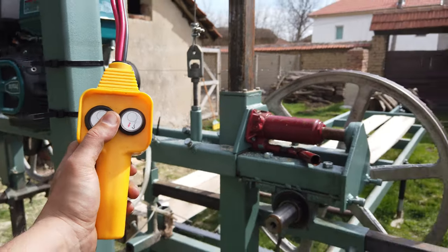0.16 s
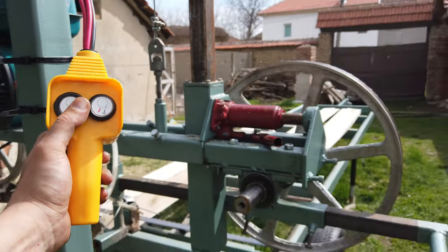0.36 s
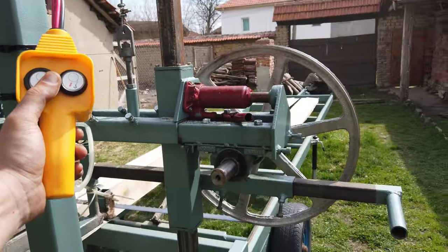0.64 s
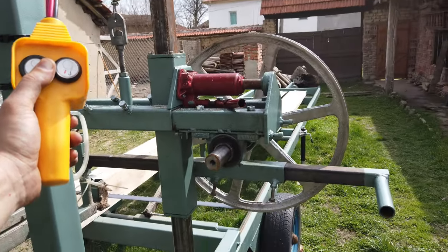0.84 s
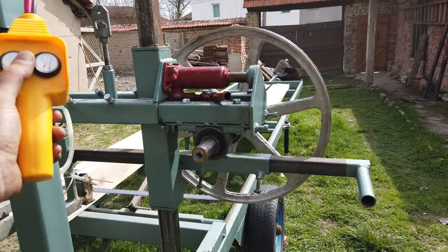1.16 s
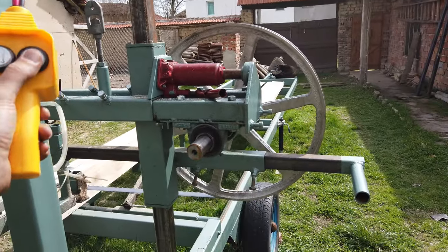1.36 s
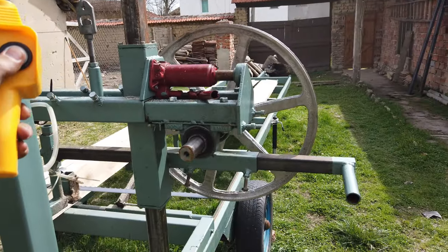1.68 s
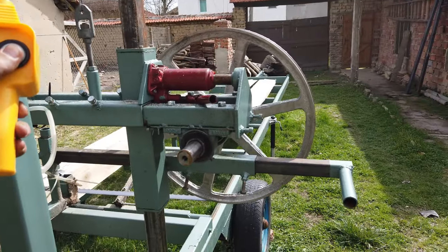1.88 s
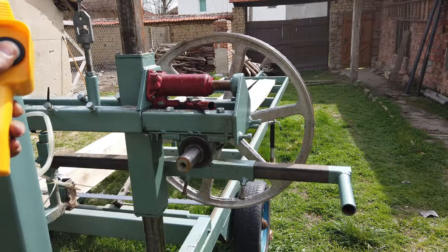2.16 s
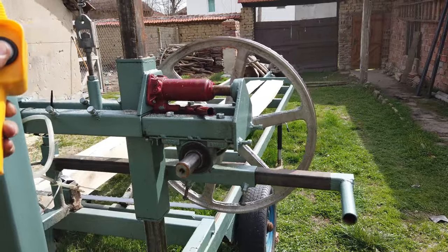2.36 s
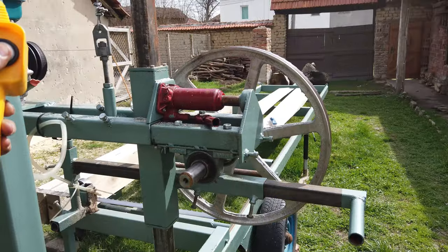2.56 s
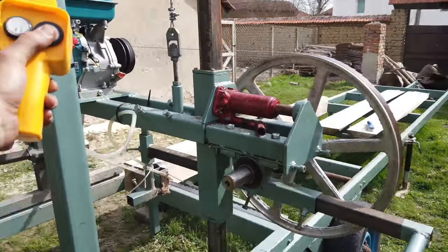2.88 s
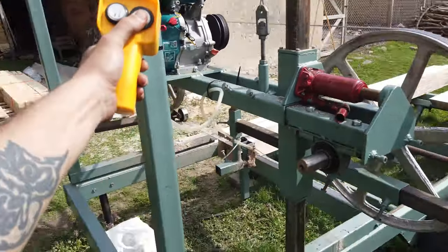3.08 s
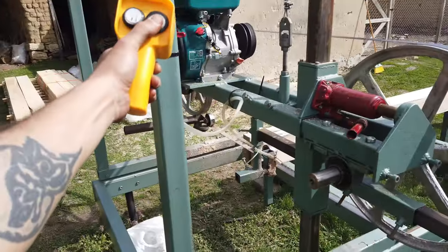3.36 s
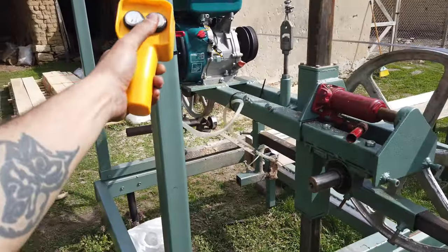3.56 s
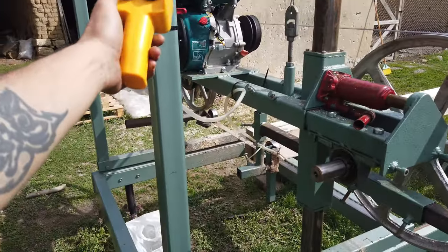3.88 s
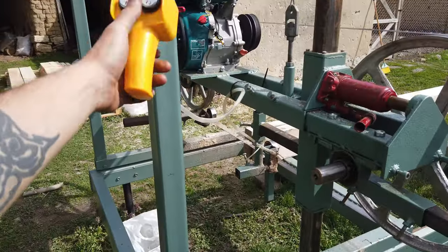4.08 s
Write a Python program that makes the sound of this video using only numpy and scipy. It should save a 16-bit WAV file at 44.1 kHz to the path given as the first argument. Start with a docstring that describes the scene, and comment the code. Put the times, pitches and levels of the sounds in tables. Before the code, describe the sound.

A handheld microphone stands a step from a winch on a steel frame. The motor grinds and whines under strain for about a second, cuts off with a jolt, and small dry clicks follow. It spins up higher, winds down, spins up again before stopping, then coasts to rest, with occasional gear clacks and only a faint outdoor reflection.

```python
"""Outdoors, in a yard, a step from a small electric winch bolted to a steel machine frame.
It hoists a heavy part and stops against the load; a wheel rings on and a switch clicks.
Then it lowers twice, faster, coasting down each time: the motor whines, the gears grind and throb.
Whine is summed shaft overtones, grinding is noise pulsed once a turn, clacks and rings are struck modes."""
import sys
import numpy as np
from scipy import signal
from scipy.fft import rfft, irfft
from scipy.io import wavfile

SR = 44100
rng = np.random.default_rng(int(sys.argv[2]) if len(sys.argv) > 2 else 0)


def materialize(psi):
    """Save the field psi as 16-bit PCM at rate SR to the path in sys.argv[1].

    A 1-D psi becomes a single channel; in a 2-D psi each row is a channel.
    """
    bounded = np.clip(np.atleast_2d(psi).T, -1, 1)
    quanta = np.round(bounded * 32767).astype(np.int16)
    wavfile.write(sys.argv[1], SR, quanta)


N = 186498
TIME = np.arange(N) / SR
HZ = np.fft.rfftfreq(N, 1 / SR)

# Motor speed while hoisting, before surge and jitter. Each row: time in seconds, turns per second.
HOIST_SPEED_HZ = [(0, 267), (.06, 267.5), (.14, 271.5), (.2, 269), (.36, 270.5), (.55, 273), (.63, 279),
                  (.69, 278), (.82, 281.5), (.89, 277.5), (.96, 277)]
# Hoisting whine. Each row: multiple of motor speed, relative dB with cable slack, relative dB with it tight.
HOIST_OVERTONES = [(2, -13.5, -13), (4, -11, -4), (5, -3, 0.5), (6, -4.5, -3), (7, -11.5, 1), (8, 1, -1),
                   (9, -8, -2), (10, -2.5, -7.5), (11, 2.5, 4.5), (12, 1.5, -0.5), (13, -1, -2),
                   (14, -14.5, -9.5), (15, -5.5, -7)]
# Lowering whine. Each row: multiple of motor speed, relative dB in the first lowering, in the second.
LOWER_OVERTONES = [(2, -3, 0), (3, 2.5, -2), (4, 0.5, 2.5), (5, 3, 4.5), (6, 7, 5.5), (7, 3.5, 4),
                   (8, 3, 3.5), (9, 3.5, -2.5), (10, 4.5, 8), (11, -6, 3.5), (12, 0.5, -0.5)]
# Colour of the gears grinding on the hoist. Each row: frequency in Hz, relative dB per Hz.
HOIST_GRIND_COLOUR = [(60, -32.5), (130, -19.5), (280, -14), (520, -12), (680, -16.5), (930, -15),
                      (1100, -10), (1500, -10.5), (2100, -2.5), (2600, -4.5), (3200, -0.5), (3800, -13),
                      (5200, -16.5), (7500, -22.5), (10000, -28), (15500, -43.5)]
# Colour of the gears grinding on the way down. Each row: frequency in Hz, relative dB per Hz.
LOWER_GRIND_COLOUR = [(60, -30), (130, -48), (300, -2.5), (540, -9.5), (720, -5.5), (820, -2), (930, -9),
                      (1080, -4), (1400, -0.5), (2300, 6), (2800, 1), (3100, 7.5), (3450, 5.5), (3750, -1),
                      (4800, -8.5), (7000, -17.5), (11500, -27.5), (15500, -37.5)]
# Ringing of the steel frame. Each row: frequency in Hz, relative dB, t60 in seconds.
FRAME_MODES = [(305, -14.5, 0.32), (461, 3, 0.52), (756, -6.5, 0.17), (846.6, 10, 0.17), (1630, -2, 0.1),
               (1910, -14.5, 0.089), (2160, -9.5, 0.15), (2490, -4.5, 0.1), (2670, -12.5, 0.19),
               (3110, -3, 0.16), (3480, -8.5, .1)]
# Clicks of the switch and the settling gear train. Each row: start in seconds, relative dB.
CLICK_HITS = [(1.085, -39), (1.2468, -53), (1.3662, -52), (1.4797, -39), (1.5835, -56), (1.606, -60)]
# Ringing of one click. Each row: frequency in Hz, relative dB, t60 in seconds.
CLICK_RING = [(1543, 2, 0.031), (2250, 6, 0.027), (2940, -9.5, .03), (3550, -3.5, 0.02)]
# Gear teeth clacking. Each row: start in seconds, peak dB, pitch in Hz.
TOOTH_CLACKS = [(.003, -9.5, 2930), (.179, -12.5, 2900), (0.9335, -18, 3140), (1.01, -25, 2310),
                (1.665, -26.5, 2380), (1.7618, -16, 2990), (1.8117, -11.5, 2315), (2.756, -26, 3050),
                (2.7938, -14, 3420), (3.2513, -16, 2710), (3.3322, -20, 2024), (3.53, -26, 6460),
                (3.673, -23.5, 1800), (4.196, -47.5, 2320)]
# Colour of the still air. Each row: frequency in Hz, relative dB per Hz.
AIR_COLOUR = [(15, -22), (25, -3), (42, -0.5), (70, -6), (150, -14), (363, -20.5), (488, -17.5),
              (655, -24.5), (1540, -23.5), (2500, -23.5), (3540, -35), (6200, -39), (15000, -57)]
# Stereo width. Each row: frequency in Hz, left-right likeness from -1 to 1.
LIKENESS = [(100, 1), (300, 0.97), (520, 0.95), (750, 0.46), (1200, 0.62), (2500, 0.31), (4500, 0.26),
            (8000, -0.35), (15000, 0.26)]
# The brake grabs or the load settles. Each row: start in seconds, peak dB.
THUMP_HITS = [(.99, -37), (1.03, -38.5), (1.2, -58), (4.03, -43), (4.1, -56)]
# Ringing of one thump. Each row: frequency in Hz, relative dB, t60 in seconds.
THUMP_RING = [(125.5, -12, 0.39), (162, 2, 0.15), (397, 0, 0.2)]
# Colour of the cable drum rolling in its bearings. Each row: frequency in Hz, relative dB per Hz.
DRUM_COLOUR = [(60, -26), (105, -8.5), (150, -0.5), (230, -7.5), (380, 7), (465, 1.5), (540, 3.5),
               (760, -0.5), (830, 9), (930, -7), (2000, 3.5), (6000, -45)]
# Ringing of the big spoked wheel. Each row: frequency in Hz, relative dB, t60 in seconds.
WHEEL_MODES = [(840, -12.5, 0.84), (1110, -17.5, 0.98), (1640, -4, 0.75), (1887, -5.5, 1.13),
               (2283, -23, 1.2), (2918, -16, 0.46), (6100, -12, 0.27)]
# Gain on a band near 3.2 kHz as the microphone's facing shifts. Each row: time in seconds, dB.
FACING_GAIN = [(2.0, 1), (2.9, 2), (3.15, -4), (3.5, -7.5)]
# Presses of the lowering button. Each row: press in seconds, release in seconds, top speed in Hz,
# gear level in dB before trims, fade while coasting in dB per second, low panel level in dB.
BUTTON_PRESSES = [(1.632, 2.372, 341.1, -24.5, 3.5, -29.5), (2.75, 3.453, 338.2, -26, -4.5, -39.5)]
# Resonances of the motor housing. Each row: frequency in Hz, width in Hz, relative dB.
HOUSING_MODES = [(1000, 13.5, 3), (1329, 51, 2.5), (1616, 68, 0), (1843, 180, -4), (2140, 84, -5.5),
                 (2418, 360, -3), (2605, 80, -9), (3012, 56, 2.5), (3535, 170, -1), (3980, 140, -1.5)]
# Colour of the button rubbing in its guide. Each row: frequency in Hz, relative dB per Hz.
SCRAPE_COLOUR = [(300, -22), (1100, -15), (1550, 1), (1900, -6), (2300, 0), (2800, -2), (3600, 0),
                 (4700, -6), (5600, -25.5), (12000, -47.5)]
# Two panels droning as the drum creeps to rest. Each row: frequency in Hz, relative dB per Hz.
CREEP_COLOUR = [(100, -17), (190, -12.5), (420, -25), (460, -5), (500, -17), (780, -24), (830, 1.5),
                (890, -28), (1500, -40), (4000, -70)]

FIRST_GEAR, SECOND_GEAR = 15.6, 49.25  # motor turns per gear turn
SURGE_HZ, SURGE_AT = 0.99, 0.715  # hoist speed surges once a second-gear turn, at this share of it
TIGHTEN_S = 0.79  # time the cable takes to come tight
HOIST_DB, HOIST_GEARS_DB, HOIST_WHINE_DB, HOIST_FLUTTER_DB = -25.5, -2.6, .8, .8
BRAKE_AT_S, RATTLE_FADE_DB_PER_S, WHINE_FADE_S = 0.95, 192, .07
WHEEL_AT_S, WHEEL_DB = 0.94, -44
BOUNCE_S, BOUNCE_DB = 0.00285, -7  # each contact lands twice
SCRAPE_AT_S, SCRAPE_S, SCRAPE_DB = 1.57, 0.068, -72.5
SPIN_UP_S = .047  # time constant of the run-up
DRAG_S, FRICTION_HZ_PER_S = 1.467, 296  # coasting: drag in step with speed, plus dry friction
TAKE_UP_S, SWELL_S = 0.012, 0.039  # from rest, the gears engage after a delay and swell in
RATTLE_KNEE_HZ, STRAIN_DB = 265, 6.5  # gears quieten below the knee, are louder under strain
LOOSE, LOOSER_WHEN_SLOW = .3, .65
YARD_DB, AIR_DB = -33, -69.5
EDGE_HZ = 15650


def amp(db):
    """Decibels to gain."""
    return 10 ** (np.asarray(db) / 20)


def unit(x):
    """Scales to rms 1."""
    return x / np.sqrt(np.mean(abs(x) ** 2) + 1e-20)


def curves(rows):
    """Each column of a timed table, sample by sample."""
    s, *columns = np.transpose(rows)
    return [np.interp(TIME, s, c) for c in columns]


def read(points, hz):
    """A spectrum joined by straight lines over log frequency."""
    f, value = np.transpose(points)
    return np.interp(np.log(hz + 1), np.log(f + 1), value)


def wander(rate_hz):
    """Slow random drift of rms 1, made at 1/32 of the sample rate."""
    count = N // 32 + 2
    f = np.fft.rfftfreq(count, 32 / SR)
    lowpass = 1 / np.sqrt(1 + (f / rate_hz) ** 4)
    slow = irfft(rfft(rng.standard_normal(count)) * lowpass, count)
    return unit(np.interp(np.linspace(0, count - 1, N), np.arange(count), slow))


def noise():
    """Two unrelated channels of white noise."""
    return rng.standard_normal((2, N))


def spread(pair, colour):
    """Colours two unrelated signals and mixes them to the tabled left-right likeness, at rms 1."""
    a, b = rfft(pair)
    same = np.clip(read(LIKENESS, HZ), -1, 1)
    mid, side = a * np.sqrt(1 + same), b * np.sqrt(1 - same)
    return unit(irfft(np.array([mid + side, mid - side]) * amp(read(colour, HZ)), N))


def ring(modes, seconds):
    """The stereo answer of a set of decaying modes to one blow."""
    t = np.arange(int(seconds * SR)) / SR
    phases = rng.uniform(-0.23, 0.02, (len(modes), 2, 1))  # turns
    out = np.zeros((2, len(t)))
    for (hz, db, t60), phase in zip(modes, phases):
        out += amp(db - 60 * t / t60) * np.cos(2 * np.pi * (hz * t + phase))
    return out


def scatter(t60, seconds):
    """A dense stereo noise tail, scaled to energy 1 on the left."""
    t = np.arange(int(seconds * SR)) / SR
    tail = rng.standard_normal((2, len(t))) * np.exp(-np.log(1000) * t / t60)
    return tail / np.linalg.norm(tail[0])


def through(x, answer):
    """Convolves and keeps the scene's length."""
    return signal.fftconvolve(np.atleast_2d(x), answer, axes=1)[:, :N]


def bandpass(x, low_hz, high_hz, order):
    """Butterworth band filter."""
    return signal.sosfilt(signal.butter(order, [low_hz, high_hz], "band", fs=SR, output="sos"), x)


def blows(rows):
    """One impulse for each row of (s, dB)."""
    out = np.zeros(N)
    for s, db in rows:
        out[int(max(s, 0) * SR)] += amp(db)
    return out


def running(start_s, stop_s, fade_s):
    """Swells in at start and dies away after stop."""
    swell = np.clip((TIME - start_s) / SWELL_S, 0, 1) ** 2
    return swell * np.exp(-np.maximum(TIME - stop_s, 0) / fade_s)


def throb(turns, slack_at, depth_db, half_turn_db):
    """Second gear's slack: level dips once a turn and half a turn later (negative: swells), mean 0 dB."""
    angle = np.cos(2 * np.pi * (turns / SECOND_GEAR - slack_at))
    dips = depth_db * np.exp(4 * (angle - 1)) + half_turn_db * np.exp(4 * (-angle - 1))
    return dips.mean() - dips


def flicker(x, depth_db, rate_hz):
    """Each band of the treble flickers on its own."""
    centres_hz, spectrum = np.geomspace(4000, 15000, 9), rfft(x)
    shares = [np.interp(HZ, centres_hz, one) for one in np.eye(len(centres_hz))]
    return sum(irfft(spectrum * share, N) * amp(depth_db * wander(rate_hz)) for share in shares)


def grind(turns, colour, treble_db, bite, uneven_db, flutter_db, ringing, case_t60):
    """Each turn of the pinion throws a burst of tooth impacts, of uneven force, into the gear case."""
    force = amp(uneven_db * rng.standard_normal(2000))[turns.astype(int)]  # one draw per turn
    bursts = force * np.exp(bite * np.cos(2 * np.pi * turns)) * amp(flutter_db * wander(23))
    impacts = unit(bursts * noise())
    case = through(impacts, scatter(case_t60, 0.093))
    sound = spread(impacts + ringing * case, colour)
    treble = irfft(rfft(sound) / (1 + (5200 / (HZ + 1)) ** 8), N)
    return sound - treble + amp(treble_db) * flicker(treble, depth_db=1.5, rate_hz=35)


def backlash(turns, chance):
    """On random turns a slack tooth slaps its neighbour; the case clanks briefly at one of six spots."""
    new_turn = np.diff(np.floor(turns), prepend=0) > 0
    slaps = new_turn * (rng.random(N) < chance) * amp(2.5 * rng.standard_normal(N))
    spot = rng.integers(0, 6, N)
    clanks = np.zeros((2, N))
    for k in range(6):
        clanks += through(slaps * (spot == k), bandpass(scatter(.04, .06), 1200, 4100, order=4))
    return unit(clanks)


def whine(turns, orders, rough, rough_per_order, blur_hz, sway):
    """Overtones of the shaft; the first gear gives them sidebands and tooth play blurs the high ones."""
    gear, out = 2 * np.pi * turns / FIRST_GEAR, np.zeros((2, N))
    for k, db in orders:
        start, lobe, side = rng.uniform(0, 2 * np.pi, 3)
        share = np.clip(rough + rough_per_order * k, 0, .95)
        clean = np.exp(1j * (start + sway * np.sin(gear + lobe)))
        blurred = (wander(blur_hz) + 1j * wander(blur_hz)) / np.sqrt(2)
        mixed = np.sqrt(1 - share) * clean + np.sqrt(share) * blurred
        line = mixed * np.exp(2j * np.pi * k * turns)
        # left-right phase offset drawn from the tabled likeness
        half_angle = np.arccos(np.clip(read(LIKENESS, k * 300), -1, 1)) / 2
        apart = half_angle * (np.sign(np.sin(side)) * 0.69 + .5 * wander(4.9))
        out += amp(db) * (line * np.exp(1j * np.array([apart, -apart]))).real
    return unit(out)


def hum(turns, swing, lead, peak_at):
    """The shaft's own tone, swelling with each turn of the first gear."""
    gear = 2 * np.pi * (turns / FIRST_GEAR - peak_at)
    swell = 1 + swing * np.cos(gear) + 0.29 * wander(21)
    return unit(swell * np.cos(2 * np.pi * turns + lead * np.sin(gear)))


def hoist():
    """Loaded motor: gears grind, order 3 sings on a panel; the brake cuts the whine faster than the rattle."""
    speed, = curves(HOIST_SPEED_HZ)
    second_gear = np.cumsum(speed) / SR / SECOND_GEAR
    speed = speed + SURGE_HZ * np.cos(2 * np.pi * (second_gear - SURGE_AT))
    turns = np.cumsum(speed * (1 + 0.003 * wander(25))) / SR
    braked_s = np.maximum(TIME - BRAKE_AT_S, 0)
    tight = np.clip(TIME / TIGHTEN_S, 0, 1) ** 2

    # brighter as the cable tightens
    treble_db = -0.5 + 4.1 * tight - 110 * braked_s
    treble_db = treble_db + throb(turns, slack_at=0.28, depth_db=0.0, half_turn_db=-2.7)
    gears = grind(turns, HOIST_GRIND_COLOUR, treble_db, bite=0.3, uneven_db=0.9,
                  flutter_db=HOIST_FLUTTER_DB, ringing=0.55, case_t60=0.12)
    gears = amp(HOIST_GEARS_DB) * gears + amp(-11.5) * backlash(turns, chance=.3)

    orders = [(k, slack_db + (tight_db - slack_db) * tight) for k, slack_db, tight_db in HOIST_OVERTONES]
    tone = whine(turns, orders, rough=0.1226, rough_per_order=0.067, blur_hz=24.6, sway=0.61)
    shaft = amp(-26 + 6.5 * tight) * hum(turns, swing=0.22, lead=0.55, peak_at=0.64)
    panel_db = -12.5 + 3.1 * tight + throb(turns, slack_at=0.53, depth_db=4.5, half_turn_db=4)
    panel = amp(panel_db) * whine(turns, [(3, 0)], rough=0.32, rough_per_order=0, blur_hz=30, sway=0.89)
    tonal = (amp(HOIST_WHINE_DB) * tone + shaft + panel) * np.exp(-braked_s / WHINE_FADE_S)
    return amp(HOIST_DB - RATTLE_FADE_DB_PER_S * braked_s) * (gears + tonal)


def clacks():
    """A tooth now and then lands hard: the gear case clatters and rings briefly, at that clack's pitch."""
    out = np.zeros((2, N))
    for s, db, hz in TOOTH_CLACKS:
        clatter = bandpass(scatter(0.091, .12), .7 * hz, min(0.94 * hz, EDGE_HZ), order=2)
        clack = unit(clatter) + 1.2 * unit(ring([(hz, 0, .05)], .12))
        out += through(blows([(s, db)]), clack / abs(clack).max())
    return out


def frame(winch):
    """The steel frame rings in its modes, driven by the winch."""
    return amp(-60.0) * through(winch.mean(0), ring(FRAME_MODES, 1.5))


def yard(near):
    """Yard walls answer faintly with a dense tail."""
    return amp(YARD_DB) * through(near, scatter(.4, .6))


def still_air():
    """Steady coloured noise."""
    return amp(AIR_DB) * spread(noise(), AIR_COLOUR)


def wheel():
    """The jolt of the brake leaves the big wheel ringing softly through the pause."""
    return through(blows([(WHEEL_AT_S, WHEEL_DB)]), ring(WHEEL_MODES, 1.5))


def thumps():
    """The jolt of stopping shakes the hanging load in a few low modes."""
    jolt = bandpass(ring(THUMP_RING, .3), 90, 700, order=2)
    return through(blows(THUMP_HITS), jolt / abs(jolt).max())


def clicks():
    """Small dry clicks while the motor rests, each a brief rattle of contacts."""
    snap = ring(CLICK_RING, .08)
    snap = bandpass(snap / abs(snap).max() + 1.7 * scatter(0.032, .08), 1000, 4700, order=5)
    bounces = [(s + BOUNCE_S, db + BOUNCE_DB) for s, db in CLICK_HITS]
    hits = blows(CLICK_HITS) + blows(bounces)
    return amp(-3.5) * through(hits, snap / abs(snap).max())


def scrape():
    """The button rubs unevenly in its plastic guide as it is pushed in, before the gears engage."""
    stroke = np.sin(np.pi * np.clip((TIME - SCRAPE_AT_S) / SCRAPE_S, 0, 1) ** 0.75)
    return amp(SCRAPE_DB) * stroke * spread(noise() * amp(4.6 * wander(200)), SCRAPE_COLOUR)


def lowering_controls():
    """Speed, strain, gear and panel dB: a press spins the motor up; on release drag and friction slow it."""
    controls = np.zeros((4, N))
    for press, release, top_hz, db, fade_db_per_s, panel_db in BUTTON_PRESSES:
        held_s = np.clip(TIME, press, release) - press
        coasted_s = np.maximum(TIME - release, 0)
        speed_at_press = controls[0, int(press * SR)]
        strain = (1 - speed_at_press / top_hz) * np.exp(-held_s / SPIN_UP_S)
        kept = np.exp(-coasted_s / DRAG_S)
        speed = top_hz * (1 - strain) * kept - FRICTION_HZ_PER_S * DRAG_S * (1 - kept)
        speed = np.maximum(speed, 1)
        rattle = (1 + (RATTLE_KNEE_HZ / top_hz) ** 2) / (1 + (RATTLE_KNEE_HZ / speed) ** 2)
        level_db = db + 20 * np.log10(rattle) + STRAIN_DB * strain - fade_db_per_s * coasted_s
        controls = np.where(TIME >= press, [speed, strain, level_db, np.full(N, panel_db)], controls)
    return controls


def housing(tone, direct):
    """The housing rings at fixed pitches, so gliding overtones flare on each and drop between."""
    answer = direct + sum(amp(db) / (1 + 2j * (HZ - hz) / width) for hz, width, db in HOUSING_MODES)
    return unit(irfft(rfft(tone) * answer, N))


def sing(turns, hz, width_hz, order):
    """A panel sings out as one overtone of the shaft sweeps its resonance, and rings on a moment."""
    drive = np.cos(2 * np.pi * order * turns) * (1 + .35 * wander(25))
    kept = np.exp(-np.pi * width_hz / SR)
    pole = kept * np.exp(2j * np.pi * hz / SR)
    return 2 * signal.lfilter([1 - kept], [1, -pole], drive).real


def drum(pace):
    """The cable drum rolls in its bearings, juddering more as it slows."""
    judder = amp(-37.5 - 5.26 * pace + 2 * wander(30))
    return judder * spread(noise(), DRUM_COLOUR) * running(1.6, 3.896, 0.1)


def facing(sound, hz, width_hz):
    """One band of the gear noise strengthens, then weakens, as the microphone's facing shifts."""
    gain_db, = curves(FACING_GAIN)
    band = irfft(rfft(sound) / (1 + ((HZ - hz) / width_hz) ** 4), N)
    return sound + (amp(gain_db) - 1) * band


def lower():
    """Load helping, the motor races and slack gears throb; the whine clears once the motor stops straining."""
    speed, strain, level_db, panel_db = lowering_controls()
    turns, pace = np.cumsum(speed) / SR, speed / speed.max()
    eased = (1 - strain) ** 2
    level_db = level_db + throb(turns, slack_at=0.23, depth_db=3.0, half_turn_db=0.1)
    level_db = level_db + 0.18 * np.cos(2 * np.pi * (turns / FIRST_GEAR - .4))

    treble_db = 1.5 * np.maximum(level_db + 29.0, -12) + 3.0  # harder impacts are brighter
    gears = grind(turns, LOWER_GRIND_COLOUR, treble_db, bite=0.17, uneven_db=1.64,
                  flutter_db=-0.34, ringing=1.0, case_t60=0.066)

    # away from full speed the teeth chatter and roughen the whine
    loose = LOOSE + LOOSER_WHEN_SLOW * (1 - pace)
    first = TIME < BUTTON_PRESSES[1][0]
    orders = [(k, np.where(first, first_db, second_db)) for k, first_db, second_db in LOWER_OVERTONES]
    tone = whine(turns, orders, rough=loose, rough_per_order=0.046, blur_hz=30.8, sway=0.85)
    tone = housing(tone, direct=0.43) * (0.7 * pace ** 1.5 + 0.13 * pace ** 6) * eased

    fast_hum = amp(-39.5) * pace ** 6
    slow_hum = amp(-49.0 + 1.8 * (1 - pace) * wander(20)) * pace / (1 + (0.2 / pace) ** 4)
    shaft = hum(turns, swing=0.47, lead=0.59, peak_at=0.44) * (fast_hum + slow_hum) * eased

    low_panel = amp(panel_db) * sing(turns, hz=474.4, width_hz=9.1, order=2) * (1 - strain)
    mid_panel = amp(-37.0) * sing(turns, hz=588, width_hz=13, order=2)
    high_panel = amp(-38 + 48 * strain) * sing(turns, hz=842, width_hz=36, order=3) * eased

    slaps = amp(-11.5) * pace * backlash(turns, chance=.25)
    mesh = amp(-3.0) * gears + amp(-1.54) * tone + slaps
    mesh = amp(level_db + 1.5) * facing(mesh, hz=3240, width_hz=210)
    total = mesh + shaft + low_panel + mid_panel + high_panel + drum(pace)
    return total * running(BUTTON_PRESSES[0][0] + TAKE_UP_S, N / SR, 1)


def creep():
    """The last slow turns of the drum keep two panels droning, then the drone dies away."""
    return amp(-48.5) * spread(noise(), CREEP_COLOUR) * running(3.88, 4.125, 0.041)


def scene():
    """The winch shakes the frame it is bolted to; yard walls answer faintly over still air."""
    winch = hoist() + clacks() + lower()
    near = winch + frame(winch) + wheel() + thumps() + clicks() + scrape() + creep()
    return near + yard(near) + still_air()


def record(dry):
    """Linear-phase lowpass at EDGE_HZ."""
    lowpass = signal.firwin(511, EDGE_HZ, window=("kaiser", 9), fs=SR)
    return signal.oaconvolve(dry, lowpass[None], "same")


dry = scene()
out = record(dry)
materialize(out)
```